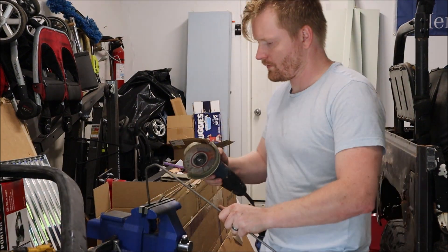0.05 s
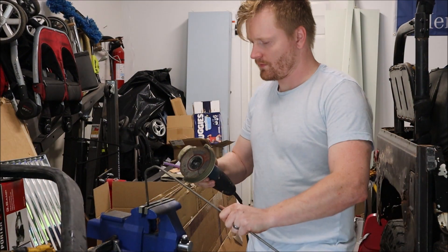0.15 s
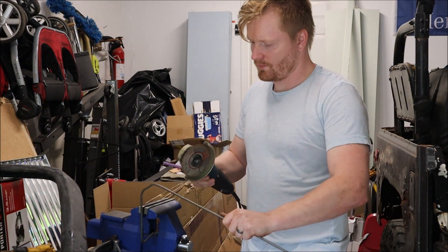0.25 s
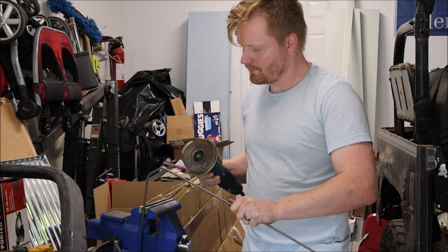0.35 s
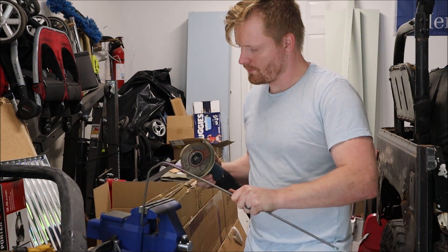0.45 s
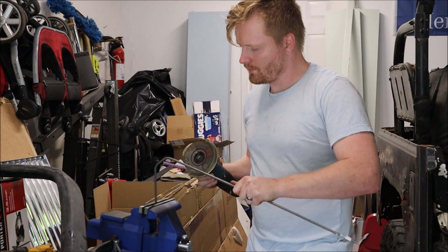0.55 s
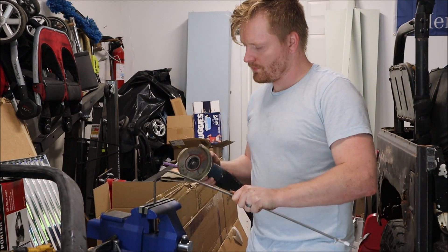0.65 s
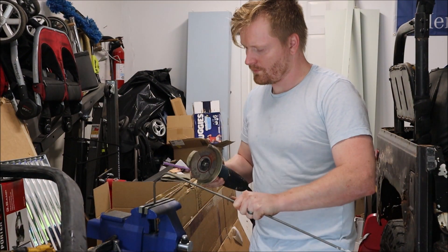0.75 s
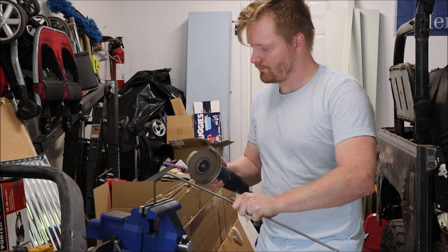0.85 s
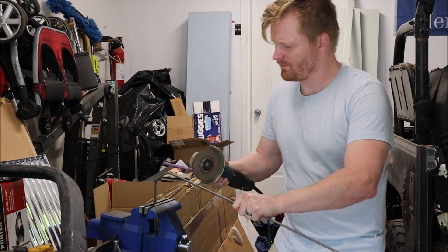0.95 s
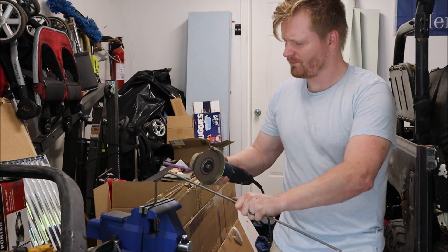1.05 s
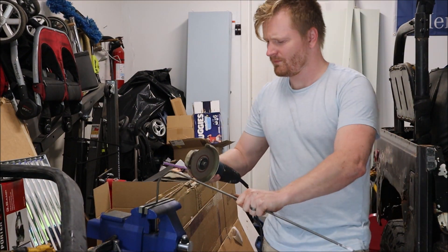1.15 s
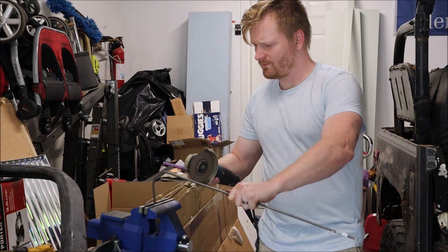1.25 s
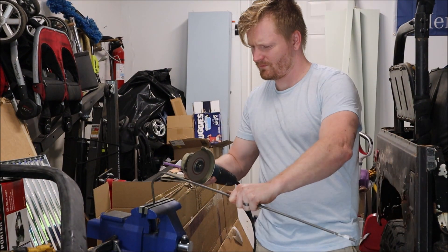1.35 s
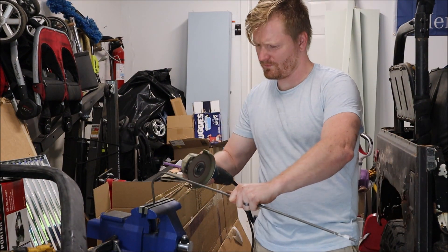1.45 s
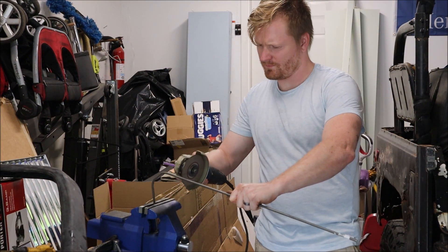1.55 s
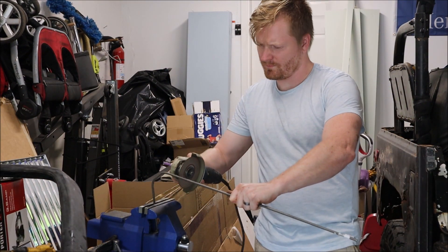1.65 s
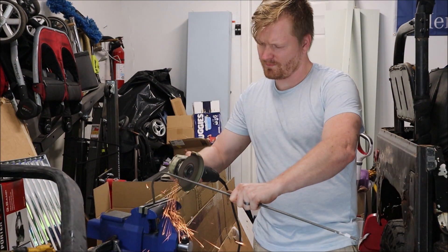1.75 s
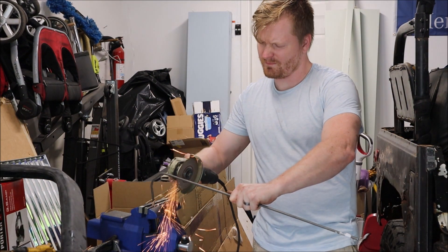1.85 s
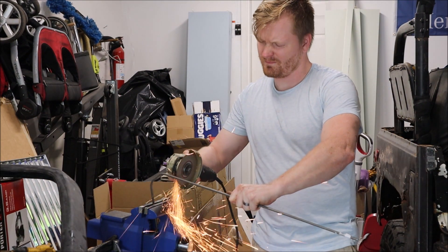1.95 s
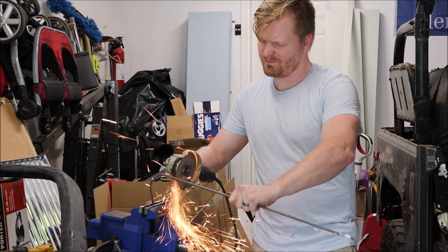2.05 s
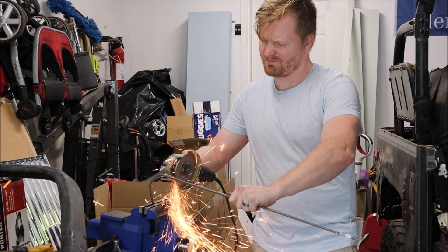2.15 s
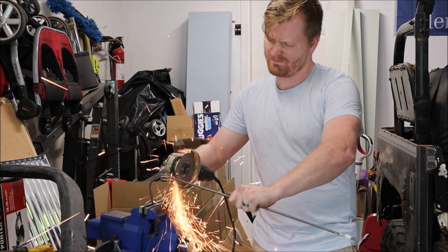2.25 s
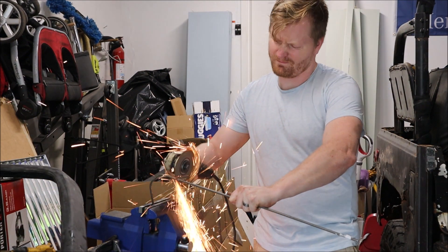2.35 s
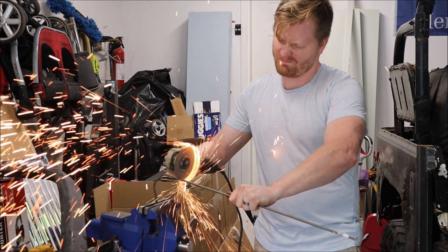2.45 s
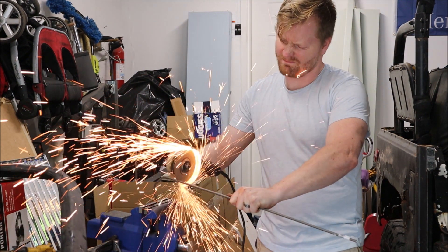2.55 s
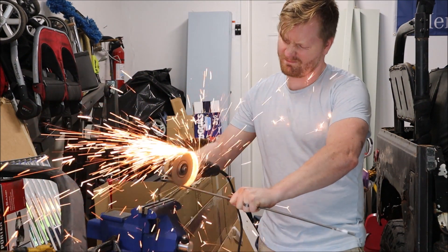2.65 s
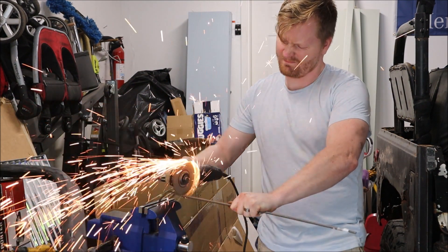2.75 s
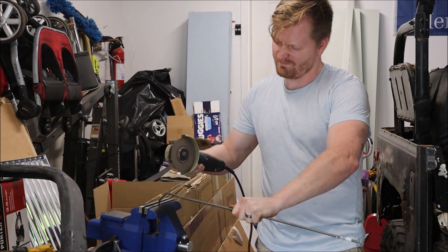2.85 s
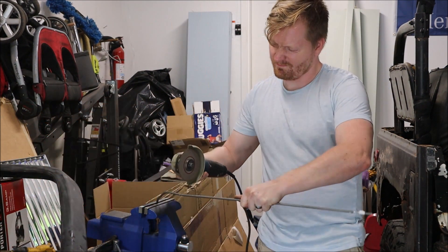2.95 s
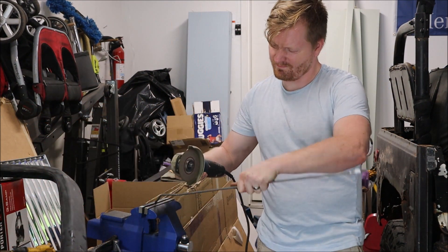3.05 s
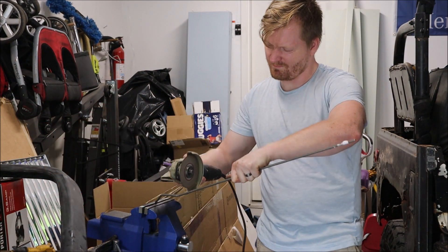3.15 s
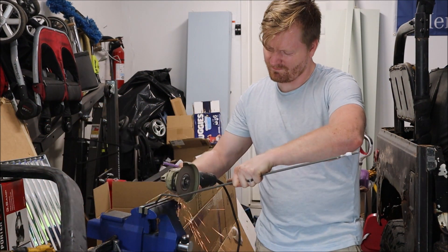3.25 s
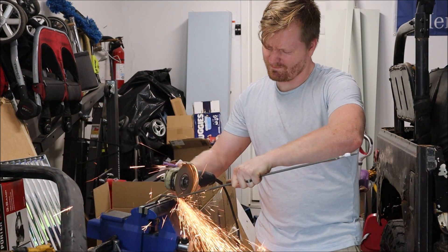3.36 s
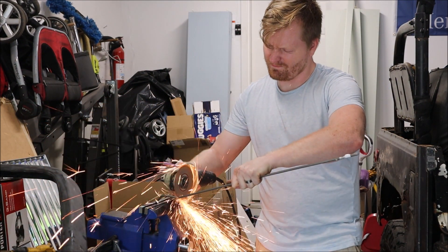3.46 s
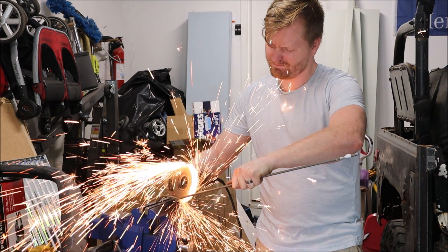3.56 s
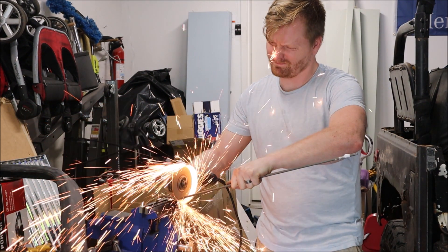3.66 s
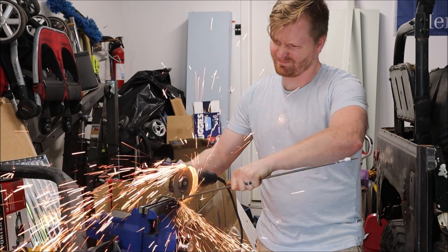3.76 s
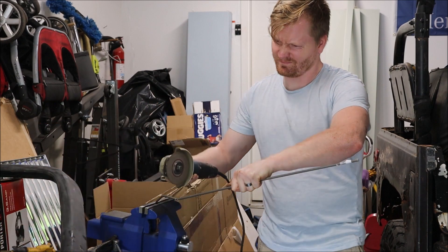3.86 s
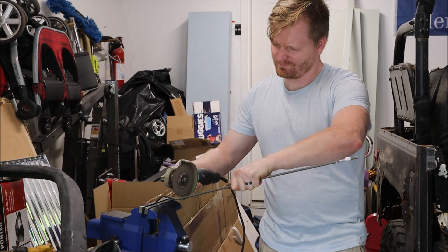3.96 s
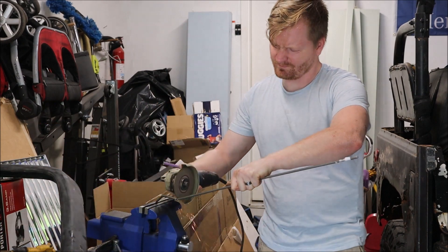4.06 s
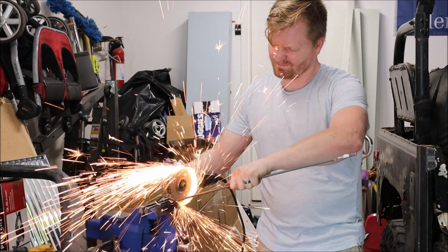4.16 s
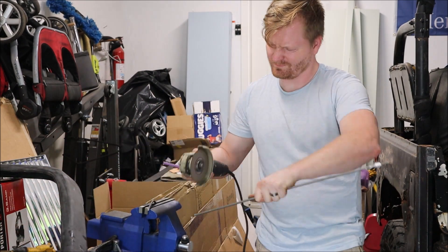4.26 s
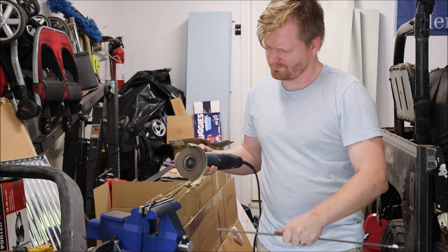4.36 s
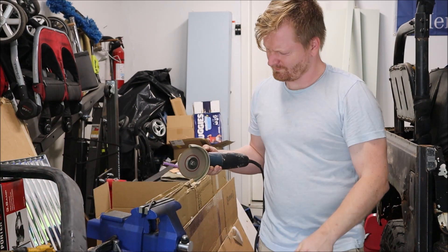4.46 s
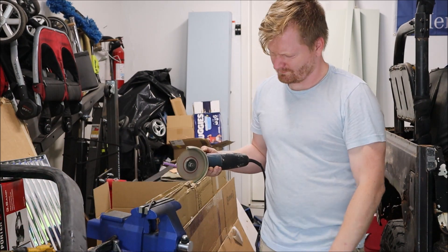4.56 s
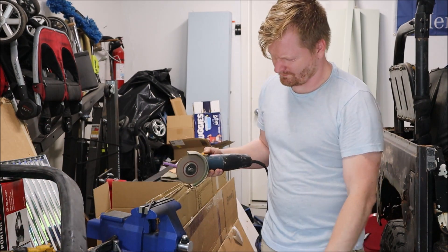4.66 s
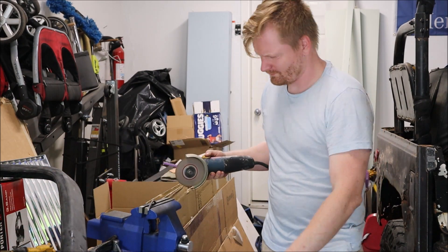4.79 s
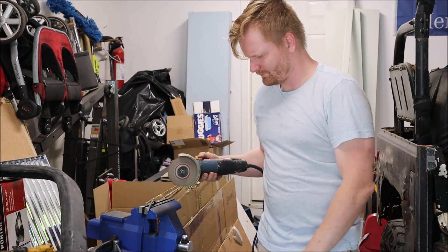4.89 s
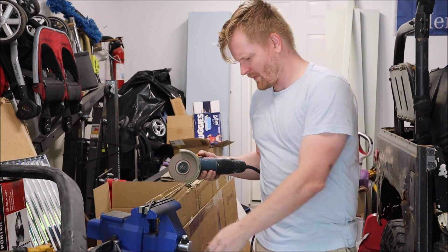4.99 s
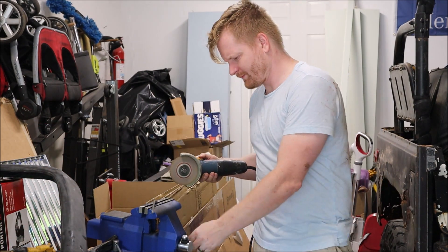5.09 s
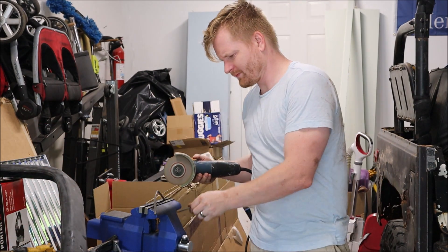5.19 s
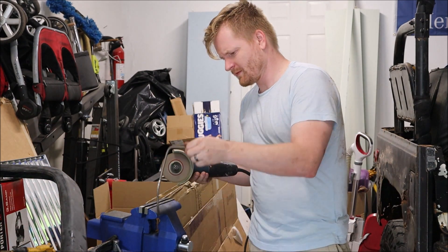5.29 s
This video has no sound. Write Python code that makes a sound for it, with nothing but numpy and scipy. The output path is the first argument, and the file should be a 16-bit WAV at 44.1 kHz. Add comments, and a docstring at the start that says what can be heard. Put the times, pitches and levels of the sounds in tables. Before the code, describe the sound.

Close mono pickup in a small cluttered garage: quick irregular metal ticks and clinks, a sharp switch clack, then the fast spin-up of a handheld grinder with rushing air and gear rattle. One long cut, a shorter growling cut and a very brief bite drag the whine down into raspy buzz. Finally the motor coasts down in falling pitch, rougher and quieter. Automatic gain flattens the loud parts; bass is thin.

```python
"""An angle grinder cuts a steel rod in a cluttered garage, over faint room tone and a fan's hum.
First the rod clinks against the vice: noise bursts plus ringing sines. Then the switch snaps and the motor
whines up: tones locked to the disc, rushing air and rattling gears. Three times the disc bites: the speed
sags, the motor buzzes harshly in sines and grit hisses. Switched off, it winds down with rattling gears.
The microphone's gain control turns loud sound down and eases back over a fraction of a second."""
import sys
import numpy as np
from scipy import signal
from scipy.fft import rfft, irfft
from scipy.io import wavfile
from scipy.ndimage import uniform_filter1d

SR = 44100
rng = np.random.default_rng(int(sys.argv[2]) if len(sys.argv) > 2 else 0)


def store_pcm(level_fs):
    """Save levels as 16-bit WAV."""
    pcm = np.round(np.clip(level_fs, -1, 1) * 32767).astype(np.int16)
    wavfile.write(sys.argv[1], SR, np.atleast_2d(pcm).T)


N = 234856
TIME = np.arange(N) / SR

# All table levels are relative: they are mixed with other gains further on.
# colour of the room tone: [f/Hz, level/dB]
ROOM_COLOUR = [(25, -24), (64, -35), (110, -22), (175, -15), (400, -9), (860, -16.5), (1130, -13),
               (1790, -16.5), (2900, -19), (3300, -14.5), (4030, -17.5), (11900, -17.5), (16000, -20.5)]
# rod and tool knock together: [t/s, level/dB, dull body level/dB, bright ring level/dB]
KNOCKS = [(0.0512, -28.5, -17.5, -35), (0.162, -34, -33, -30), (0.179, -29.5, -35, -33),
          (0.1907, -34.5, -33, -6), (0.1974, -51, -38, -9), (0.227, -42, -6, -9), (0.2593, -38.5, -19, -4),
          (0.2856, -39.5, -15.5, 3.5), (0.2944, -61, -16, -15), (0.387, -37, -18, 2.5),
          (0.417, -46, -30, 6), (0.439, -44.5, -29, -0.5), (0.623, -32.5, -23.5, -12),
          (0.63, -40.5, -33, -15), (0.737, -34, -23, -6.5)]
# colour of the dull body of a knock: [f/Hz, level/dB]
KNOCK_BODY_COLOUR = [(60, -31), (300, -11), (800, -4), (1600, 1), (2500, -1), (4000, -20)]
# colour of the crack of a knock: [f/Hz, level/dB]
KNOCK_CRACK_COLOUR = [(1500, -16), (3000, -2), (4800, 2.5), (7000, -4.5), (11000, -12), (16000, -8)]
# ring of the rod: [f/Hz, level/dB, time to fall by 60 dB/s]
ROD_MODES = [(2230, -32, .08), (3490, -7, 0.045), (4500, -21, .07), (5100, -25, .07), (6540, -4, 0.04),
             (6800, -3, 0.024), (7650, -15, .05), (9800, -5, .04), (10400, 1, 0.082), (12020, 3, 0.045),
             (13700, -3, 0.045), (15400, -5, 0.044)]
# abrasive grit tearing through the steel, also the scuff of a knock: [f/Hz, level/dB]
GRIT_COLOUR = [(3000, -29.5), (7000, -5.5), (10500, -0.5), (12500, -12), (16000, -13)]
# ring of the metal gear head: [f/Hz, width/Hz, level/dB]
GEAR_MODES = [(4840, 850, -17.5), (9680, 740, -4.5), (10350, 760, -2.5), (11090, 620, 2.5),
              (12360, 850, -18.5), (14700, 2700, -12)]
# how hard the disc is pressed into the rod: [t/s, share of the stalling load]
LOAD_CURVE = [(1.763, 0), (1.969, .103), (2.085, .221), (2.41, .241), (2.479, .4), (2.511, .119),
              (2.604, .288), (2.709, .255), (2.787, .604), (2.843, 0), (3.337, 0), (3.491, .275),
              (3.638, .416), (3.686, .302), (3.729, .367), (3.845, .167), (3.854, 0), (4.149, 0),
              (4.222, .382), (4.273, 0)]
# lower rush of the disc and cooling fan: [f/Hz, level/dB]
LOW_RUSH_COLOUR = [(60, -50), (200, -30), (500, -22.5), (900, -15), (1350, -7.5), (2200, 0), (2650, 0),
                   (3200, 2.5), (3900, -1), (5500, -11.5)]
# airy upper rush of the disc and cooling fan: [f/Hz, level/dB]
AIR_RUSH_COLOUR = [(2500, -41.5), (3800, -12), (4550, -4), (5500, -3.5), (7000, -1), (8400, 1.5),
                   (10000, 1.5), (13000, 2), (16000, -12)]
# air cavities of the vents: [f/Hz, width/Hz, level/dB]
VENT_MODES = [(3125, 39, -10), (3480, 45, -7), (4586, 140, -3.5), (5010, 160, -2), (8440, 250, 1)]
# how the housing radiates the whine: [f/Hz, level/dB]
WHINE_RESPONSE = [(600, -43), (850, -39), (1020, -16), (1190, -9), (1400, -2.5), (1600, -4), (1830, -3),
                  (1990, -3), (2075, -10.5), (2150, -5)]
# overtones of the whine and the gear mesh: [cycles per disc turn, level/dB]
OVERTONES = [(24, -6), (36, 1), (41, -1), (48, 0), (60, 2), (72, -1)]
# ring of the guard, lifting any overtone that glides through it: [f/Hz, width/Hz, level/dB]
GUARD_MODES = [(5500, 150, -2), (6300, 220, 3), (7050, 200, 2), (8400, 200, -1)]
# the disc touches the rod: [start t/s, end t/s, level/dB, growl of the rod under a deep bite level/dB]
CUTS = [(1.725, 2.875, -17, 7), (3.294, 3.885, -14.5, 16), (4.113, 4.272, -9, 15)]
# the disc snags in the cut: [t/s, half length/s, lift level/dB, chatter 0-1]
SNAGS = [(1.944, 0.049, 3.5, 0.5), (2.13, 0.02, 3.5, 0.1), (2.494, 0.056, 3.7, 0.7),
         (2.795, 0.17, 7.5, 0.95), (3.376, 0.012, 23.5, 0.9), (3.757, 0.037, 6.5, 0.17)]
# buzz of the loaded motor: [cycles per motor turn, level/dB]
BUZZ_ORDERS = [(1, -24), (2, -20), (3, -8), (4, -1), (10, 0), (13, -3), (16, 2), (19, -4), (21, 1), (22, 6),
               (23, 4), (24, -4), (26, 1), (34, -3)]
# what the gear head and guard radiate of the buzz: [f/Hz, level/dB]
HEAD_RESPONSE = [(400, -1), (500, -9), (700, -14), (3000, -27.5), (6000, -17), (8500, -10), (10500, 5.5),
                 (12400, 1), (14000, -4), (16000, -15)]

BACKGROUND_DB = -68.5   # trim on both hum and room tone
HUM_HZ = 183.6   # centre of the wavering hum
SWITCH_ON_S, SWITCH_OFF_S = .936, 4.447
KICK_SPEED, FREE_SPEED = 72.4, 174.9   # disc at switch-on and running free, turns per s
SPIN_UP_S, COAST_S = .114, .72   # time constants: following the load, coasting down
GEAR_RATIO, WHINE_ORDER = 4.1, 12   # motor turns, and whine cycles, per disc turn
# sounds that grow with speed: (trim at free speed in dB, rise per doubling of speed in dB)
LOW_RUSH_LAW, AIR_RUSH_LAW, RATTLE_LAW = (-39, 8.9), (-24.5, 9), (-25.5, 5.2)
OVERTONE_LAW = (-41, 13.5)
KICK_DB, KICK_S = 12, 0.14   # extra rattle at the start, and the time constant of its dB
WHINE_DB = -33   # whine before the housing shapes it
SHADED_DB = -4.5   # change of whine and overtones under a deep bite
AIRFLOW_S = 0.076   # the fan takes this long to get the air moving
BITE_S, LIFT_S = 0.059, .034   # the contact builds up and lets go
DEEP_LOAD = .33   # load of a deep bite, share of the stalling load
GROWL_HZ, GROWL_OCTAVES = 2450, 0.51   # centre and spread of the growl
CUTOFF_HZ = 16000   # nothing passes from here up


def from_db(db):
    """Turn decibels into gain."""
    return 10 ** (np.asarray(db) / 20)


def rms_one(x):
    """Scale a sound to unit rms, its average strength."""
    return x / np.sqrt(np.mean(x ** 2) + 1e-20)


def on_log_axis(points, where):
    """Read a table along a logarithmic axis."""
    axis, values = np.transpose(points)
    return np.interp(np.log(where + 1e-9), np.log(axis), values)


def drift(rate):
    """Slow random wander of spread about 1; a higher rate wanders faster."""
    # made at every 16th sample, then joined by straight lines
    r = np.exp(-2 * np.pi * 16 * rate / SR)
    steps = rng.standard_normal(N // 16 + 2002)
    slow = signal.lfilter([1], [1, -2 * r, r * r], steps)[2000:]
    return np.interp(np.arange(N) / 16, np.arange(len(slow)), rms_one(slow))


def noise(spectrum):
    """Noise of a given colour, with unit rms."""
    gain = from_db(on_log_axis(spectrum, np.fft.rfftfreq(N, 1 / SR)))
    return rms_one(irfft(rfft(rng.standard_normal(N)) * gain, N))


def resonate(x, hz, width_hz):
    """A resonance favours one band, with gain 1 at its top."""
    r = np.exp(-np.pi * width_hz / SR)
    feed = np.array([1, 0, -1]) * (1 - r * r) / 2
    return signal.lfilter(feed, [1, -2 * r * np.cos(2 * np.pi * hz / SR), r * r], x + 1e-18)


def ring(x, hz, t60):
    """A unit click sets a sine of starting height 1 ringing, falling by 60 dB in t60 seconds."""
    r = from_db(-60 / (t60 * SR))
    w = 2 * np.pi * hz / SR
    return signal.lfilter([0, np.sin(w)], [1, -2 * r * np.cos(w), r * r], x + 1e-18)


def clicks(times, db):
    """Single clicks at given times and levels."""
    out = np.zeros(N)
    out[np.round(np.asarray(times) * SR).astype(int)] = from_db(db)
    return out


def dying(hits, t60):
    """An envelope that jumps at each hit and falls by 60 dB in t60 seconds."""
    return signal.lfilter([1], [1, -from_db(-60 / (t60 * SR))], hits + 1e-18)


def background():
    """Room tone is coloured noise; the hum of a fan is a sine wavering in level and phase."""
    hum_gain = from_db(-4.5 + 2.0 * drift(5))
    hum = hum_gain * np.sin(2 * np.pi * HUM_HZ * TIME + 0.94 * drift(1.6))
    return from_db(BACKGROUND_DB) * (hum + from_db(7.5) * noise(ROOM_COLOUR))


def knocks():
    """Each touch gives a crack, a duller body sound, a bright scuff and the ring of the rod, damped by the hand."""
    s, db, low_db, bright_db = np.transpose(KNOCKS)
    # a short running average softens the start of the crack
    crack_envelope = uniform_filter1d(dying(clicks(s, db - 13), t60=0.092), size=160)
    crack = crack_envelope * noise(KNOCK_CRACK_COLOUR)
    body = dying(clicks(s, db + low_db - 1.5), t60=0.09) * noise(KNOCK_BODY_COLOUR)
    scuff = dying(clicks(s, db + bright_db - 16.0), t60=0.047) * noise(GRIT_COLOUR)
    # every knock excites the modes a little differently, in dB
    strength = rng.normal(0, 3.6, (len(s), len(ROD_MODES)))
    rod = 0
    for k, (hz, mode_db, t60) in enumerate(ROD_MODES):
        hits = clicks(s, db + bright_db + mode_db - 11.0 + strength[:, k])
        rod = rod + ring(hits, hz, t60)
    return crack + body + scuff + rod


def gear_head(x):
    """The metal head rings in a few broad resonances, added with alternating sign."""
    out = 0
    for k, (hz, width, db) in enumerate(GEAR_MODES):
        out = out + (-1) ** k * from_db(db) * resonate(x, hz, width)
    return out


def switch():
    """The switch snaps and the gears take up their slack with a clack and a small thud."""
    clack_noise = rms_one(gear_head(rng.standard_normal(N)))
    clack = dying(clicks([SWITCH_ON_S], -15), t60=.012) * clack_noise
    thud_noise = noise([(40, 1), (200, -12), (1500, 0), (5000, 1.5), (12000, -50)])
    thud = dying(clicks([SWITCH_ON_S], -33.5), t60=0.033) * thud_noise
    return clack + thud


def motor_speed(load):
    """The disc spins up towards a speed that drops with the load; switched off, it coasts down."""
    on, off = int(SWITCH_ON_S * SR), int(SWITCH_OFF_S * SR)
    keep = np.exp(-1 / (SPIN_UP_S * SR))
    speed = np.full(N, float(KICK_SPEED))
    target_rise = FREE_SPEED * (1 - load[on:]) - KICK_SPEED
    speed[on:] += signal.lfilter([1 - keep], [1, -keep], target_rise)
    speed[off:] = speed[off] * np.exp(-(TIME[off:] - SWITCH_OFF_S) / COAST_S)
    return speed


def by_speed(law, speed):
    """Gain of a sound that grows by so many dB per doubling of speed."""
    db, doubling_db = law
    return from_db(db + doubling_db * np.log2(speed / FREE_SPEED))


def vents():
    """Cooling air blows over the vents and rings them in narrow bands."""
    air = rng.standard_normal(N)
    return rms_one(sum(from_db(db) * resonate(air, hz, width) for hz, width, db in VENT_MODES))


def air_rush(speed, slack):
    """Disc and fan stir the air into gusty noise, stronger at speed and less steady with slack gears."""
    gusts = from_db(1.44 * drift(110) + 2.6 * slack ** 2 * drift(33))
    air = noise(AIR_RUSH_COLOUR) + from_db(-10.0) * vents()
    low = by_speed(LOW_RUSH_LAW, speed) * noise(LOW_RUSH_COLOUR)
    return gusts * (low + by_speed(AIR_RUSH_LAW, speed) * air)


def rattle(slack, taps_per_s, size_db, tight_share, slack_share, ring_hz, ring_width_hz, ring_db):
    """Teeth and brushes hiss in the head; with slack in the gears, separate taps ring the crown wheel."""
    taps = (rng.random(N) < taps_per_s / SR) * from_db(size_db * rng.random(N) ** 2)
    blows = dying(taps, t60=0.0027) * rng.standard_normal(N)
    crown_wheel = from_db(ring_db) * resonate(blows, ring_hz, ring_width_hz)
    bursts = rms_one(gear_head(blows) - crown_wheel)
    hiss = rms_one(gear_head(rng.standard_normal(N)))
    # share of the power given to separate taps
    share = np.clip(tight_share + slack * (slack_share - tight_share), 0, 1)
    return np.sqrt(share) * bursts + np.sqrt(1 - share) * hiss


def whine(turns, speed, depth, flutter_db, wander):
    """A siren tone and fluttering overtones follow the disc, coloured by housing and guard, rising with airflow."""
    housing_db = on_log_axis(WHINE_RESPONSE, WHINE_ORDER * speed)
    tone_gain = from_db(WHINE_DB + housing_db + 2.4 * drift(14.7))
    tone = tone_gain * np.sin(2 * np.pi * WHINE_ORDER * turns)
    # overtones and gear mesh swell and fade as the tool moves
    high = 0
    for order, db in OVERTONES:
        gain = from_db(db + flutter_db * drift(26))
        high = high + gain * np.sin(2 * np.pi * order * turns + wander * drift(36))
    high = high + sum(from_db(db) * resonate(high, hz, width) for hz, width, db in GUARD_MODES)
    airflow = np.clip((TIME - SWITCH_ON_S) / AIRFLOW_S, 0, 1) ** 2
    return airflow * from_db(SHADED_DB * depth) * (tone + by_speed(OVERTONE_LAW, speed) * high)


def buzz(turns, speed, chatter, growl_db, jitter, flutter_db, scatter, chatter_scatter, throb):
    """Under load the pinion knocks once a motor turn; chatter shakes the timing and smears the lines."""
    motor = GEAR_RATIO * turns + jitter * drift(150)
    out, power = 0, 0
    for order in np.arange(1, 35):
        hz = order * GEAR_RATIO * speed
        lift_db = growl_db * np.exp(-(np.log2(hz / GROWL_HZ) / GROWL_OCTAVES) ** 2)
        colour_db = on_log_axis(BUZZ_ORDERS, order) + on_log_axis(HEAD_RESPONSE, hz)
        # lines too high to be stored cleanly are left out
        gain = from_db(colour_db + lift_db + flutter_db * drift(32.0)) * (hz < .45 * SR)
        shake = order / 20 * (scatter * drift(20) + chatter_scatter * chatter ** 2 * drift(92))
        out = out + gain * np.sin(2 * np.pi * (order * motor + 0.59 * rng.random()) + shake)
        power = power + gain ** 2 / 2
    # the disc runs slightly out of true and presses harder once a turn
    wobble = 1 + throb * np.sin(2 * np.pi * turns)
    grabbing = from_db(1.5 * chatter * drift(60) - chatter)
    return out / np.sqrt(power) * wobble * grabbing


def cutting(turns, speed, depth):
    """Each cut buzzes and sprays grit, growling as the disc sinks in; a snag swells with chatter at its peak."""
    contact, growl_db, snag_db, chatter = 0, 0, 0, 0
    for start, end, db, rod_db in CUTS:
        touching = np.clip(np.minimum((TIME - start) / BITE_S, (end - TIME) / LIFT_S), 0, 1)
        contact = contact + from_db(db) * touching ** 2
        growl_db = growl_db + rod_db * touching * depth
    for s, half_s, db, shake in SNAGS:
        swell = np.exp(-((TIME - s) / half_s) ** 2)
        snag_db = snag_db + db * swell
        chatter = chatter + shake * swell ** 2
    motor = buzz(turns, speed, chatter, growl_db - 7 * chatter, jitter=0.0011, flutter_db=4.0,
                 scatter=0.89, chatter_scatter=2.2, throb=0.14)
    return contact * from_db(snag_db) * (motor + from_db(-12) * noise(GRIT_COLOUR))


def grinder():
    """Load sets the speed; speed sets the tone pitches and the level of the rush, rattle and overtones."""
    load_s, load_share = np.transpose(LOAD_CURVE)
    load = np.interp(TIME, load_s, load_share)
    speed = motor_speed(load)
    turns = np.cumsum(speed) / SR
    depth = np.clip(load / DEEP_LOAD, 0, 1)
    # the gears are slack while the disc turns slowly with nothing to cut
    slack = np.clip(1.6 * (1 - speed / FREE_SPEED), 0, 1) * (1 - depth)
    rush = air_rush(speed, slack)
    # the starting torque shakes the gears
    kick = from_db(KICK_DB * np.exp(-np.abs(TIME - SWITCH_ON_S) / KICK_S))
    gears = rattle(slack, taps_per_s=3.8 * speed, size_db=3.0, tight_share=0.13, slack_share=0.87,
                   ring_hz=12000, ring_width_hz=1800, ring_db=-5.5)
    head = kick * by_speed(RATTLE_LAW, speed) * gears
    tones = whine(turns, speed, depth, flutter_db=3.0, wander=.4)
    # silent before the switch, then a quick fade in
    running = np.clip((TIME - SWITCH_ON_S) / 0.0018, 0, 1)
    return (rush + head + tones + cutting(turns, speed, depth)) * running


def garage(x, t60, wet_db):
    """Clutter scatters a short, weak tail of echoes, made by smearing the sound with dying noise."""
    t = np.arange(SR // 2) / SR
    # the first echoes arrive after 4 ms
    tail = rng.standard_normal(len(t)) * from_db(-60 * t / t60) * (t > .004)
    return x + from_db(wet_db) * signal.fftconvolve(x, tail / np.linalg.norm(tail))[:N]


def gain_control(x, ceiling_db, glide_s, overshoot_db):
    """Sound above the ceiling is turned down gradually, overshooting only so far; the gain eases back likewise."""
    power = uniform_filter1d(x * x, size=800)
    level_db = 10 * np.log10(np.abs(power) + 1e-14)
    excess_db = np.maximum(level_db - ceiling_db, 0)
    keep = np.exp(-1 / (glide_s * SR))
    eased_db = signal.lfilter([1 - keep], [1, -keep], excess_db)
    return x * from_db(-np.maximum(eased_db, excess_db - overshoot_db))


def scene():
    """Background, rod and tool in the room, the same in both channels."""
    in_room = garage(knocks() + switch() + grinder(), t60=0.029, wet_db=-8.0)
    mono = background() + in_room
    return np.array([mono, mono])


def record(dry):
    """One microphone with little bass and an automatic gain control; the top is cut."""
    thin = signal.sosfilt(signal.butter(2, 65, "high", fs=SR, output="sos"), dry)
    levelled = gain_control(thin, ceiling_db=-36.0, glide_s=0.21, overshoot_db=5.5)
    passed = np.fft.rfftfreq(N, 1 / SR) < CUTOFF_HZ
    return irfft(rfft(levelled) * passed, N)


dry = scene()
out = record(dry)
store_pcm(out)
```